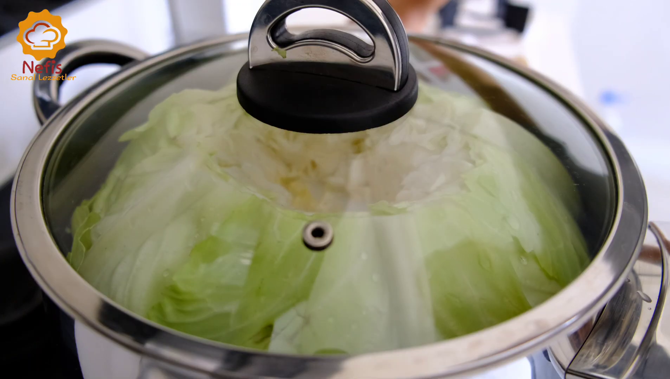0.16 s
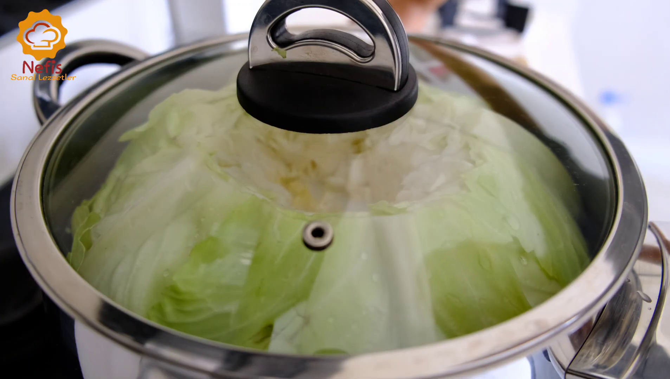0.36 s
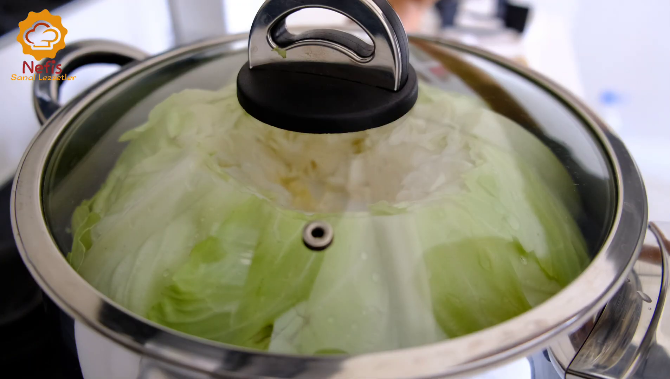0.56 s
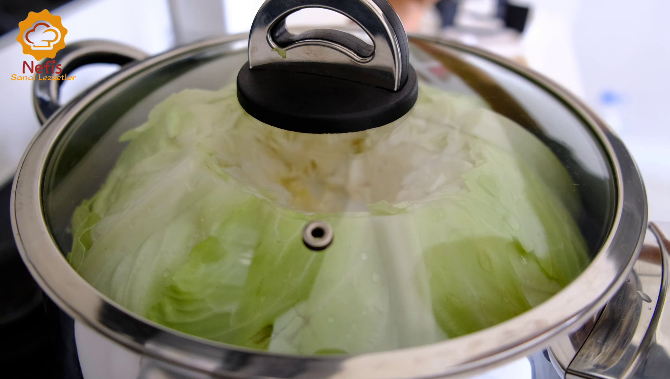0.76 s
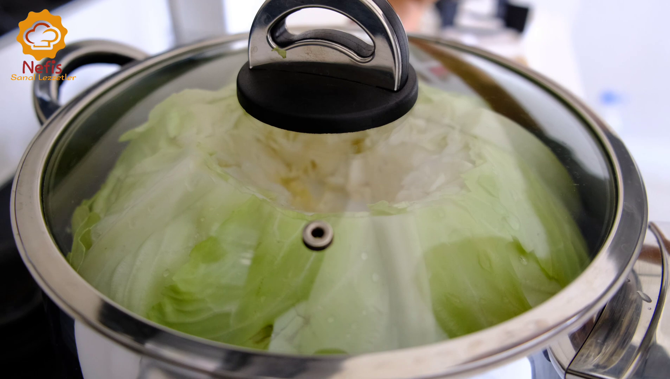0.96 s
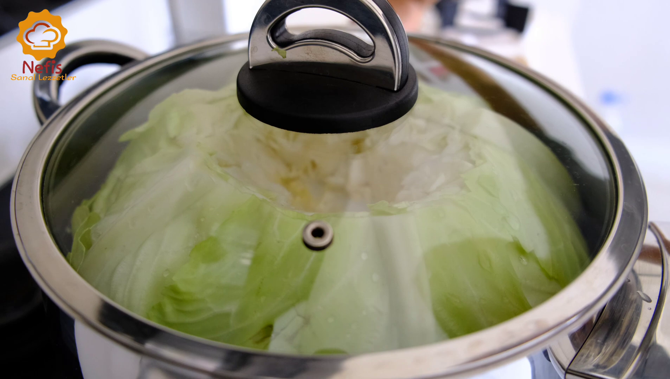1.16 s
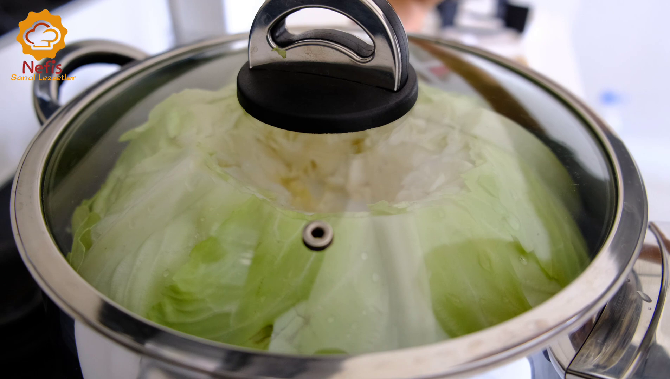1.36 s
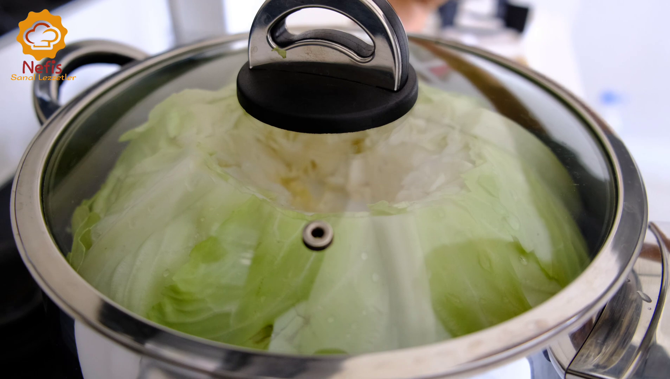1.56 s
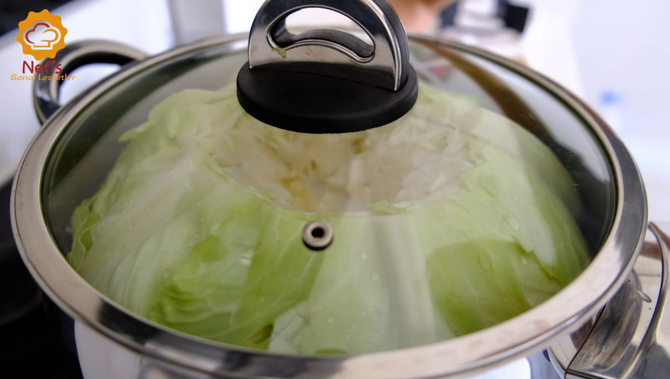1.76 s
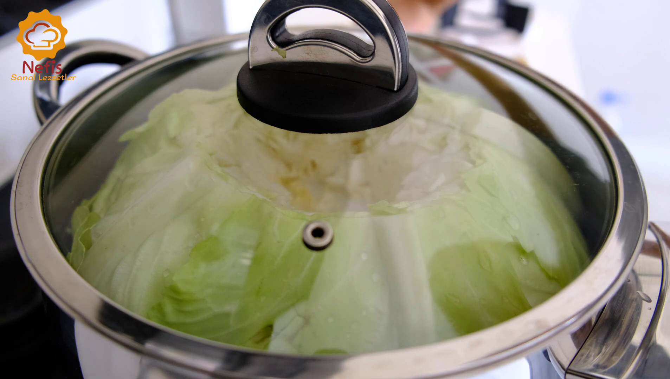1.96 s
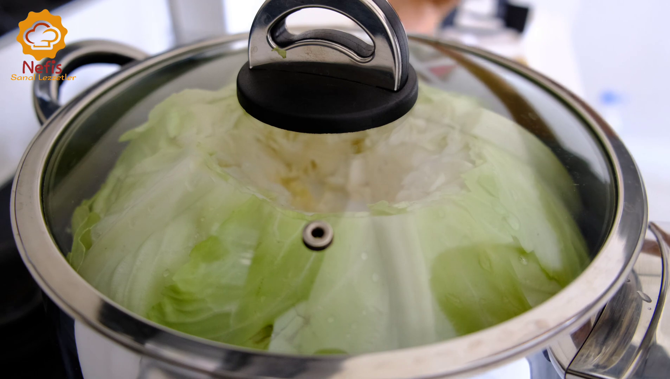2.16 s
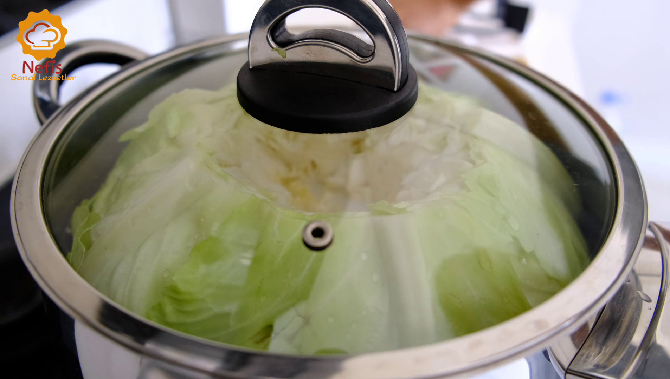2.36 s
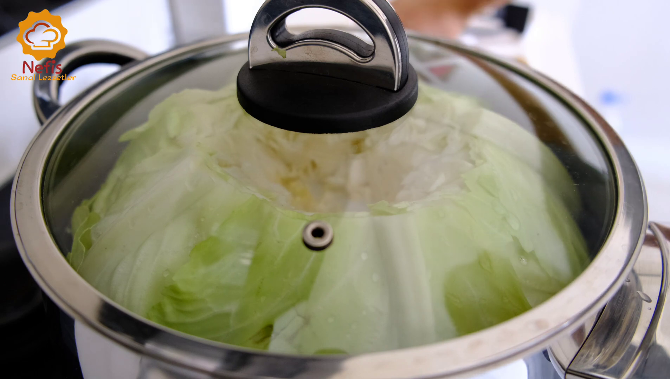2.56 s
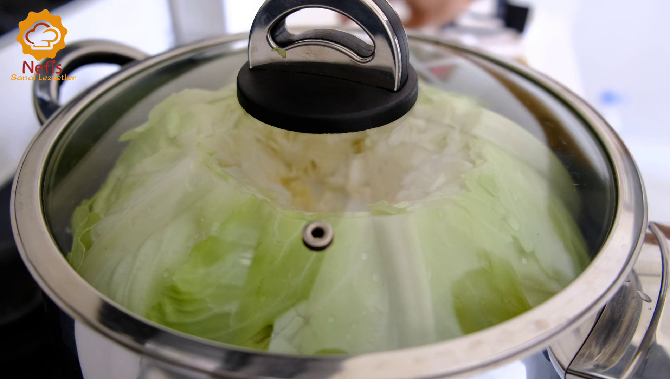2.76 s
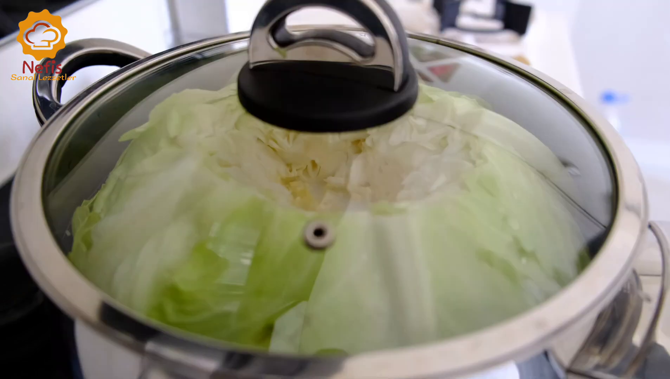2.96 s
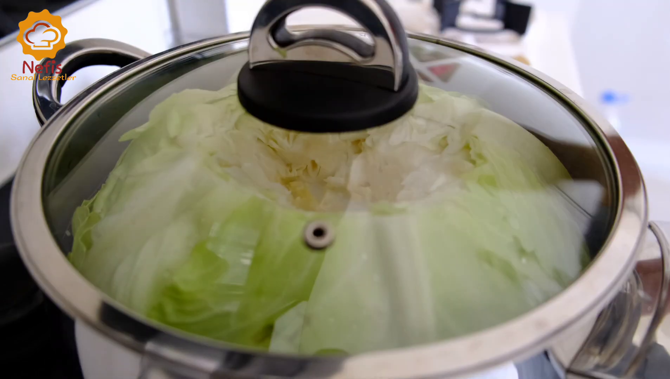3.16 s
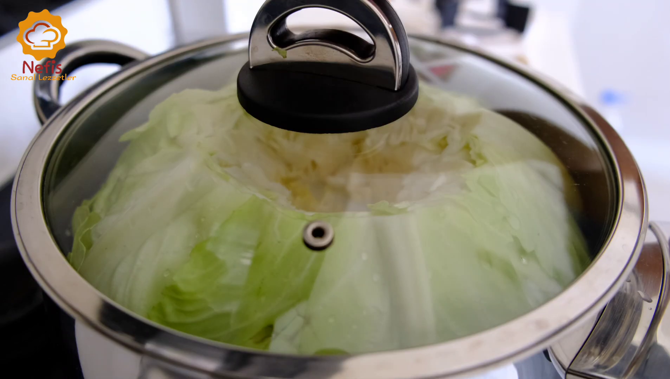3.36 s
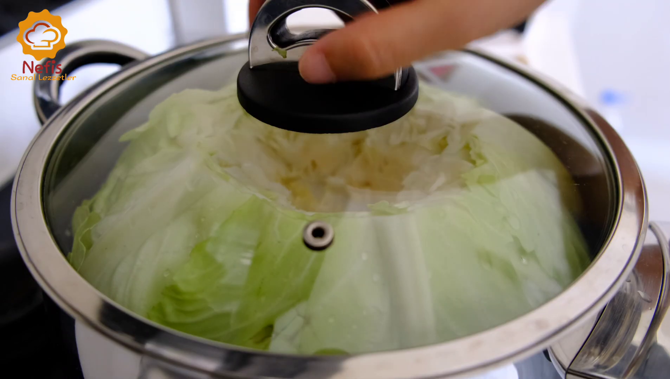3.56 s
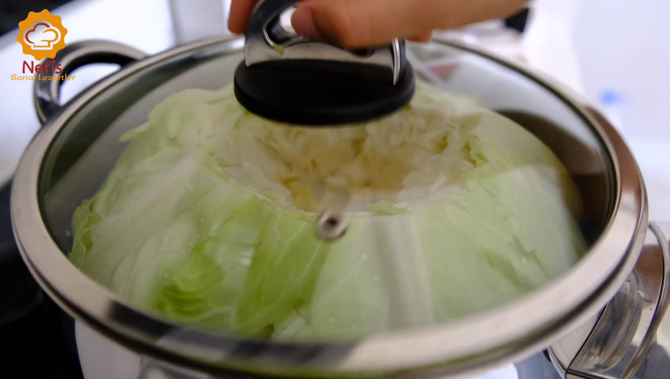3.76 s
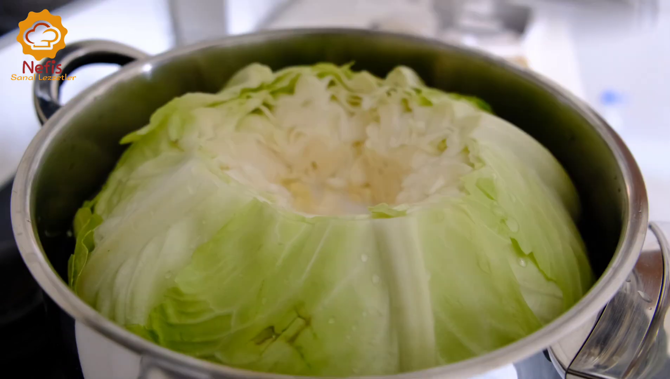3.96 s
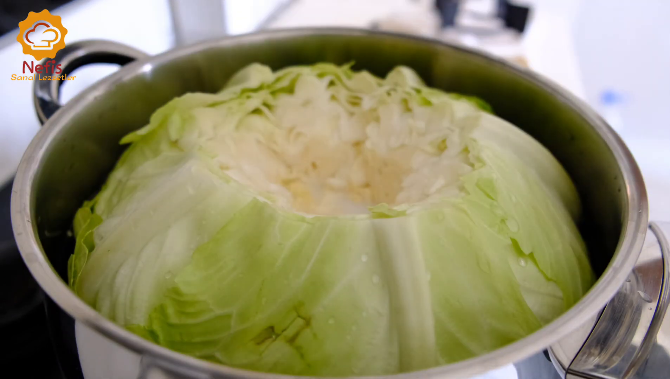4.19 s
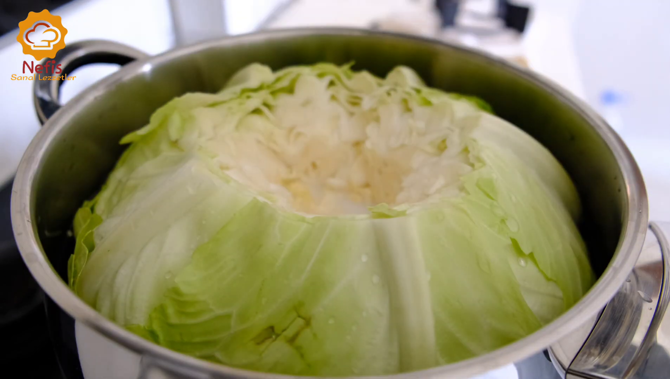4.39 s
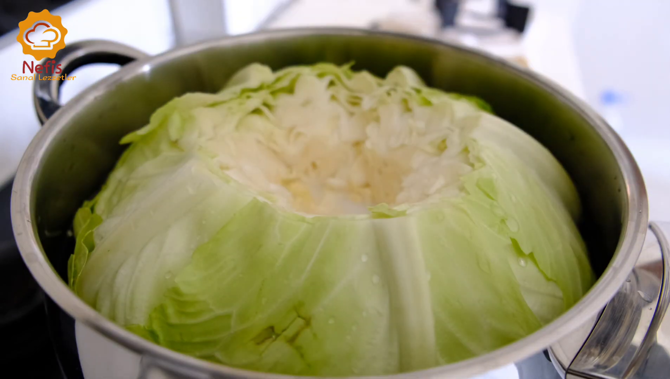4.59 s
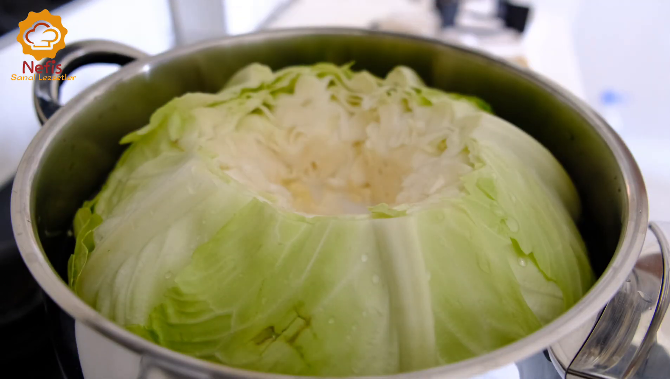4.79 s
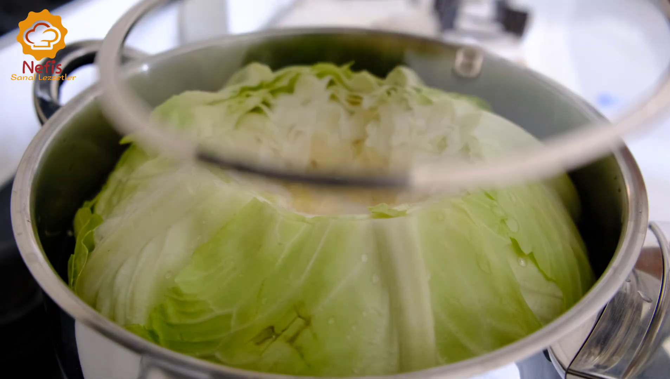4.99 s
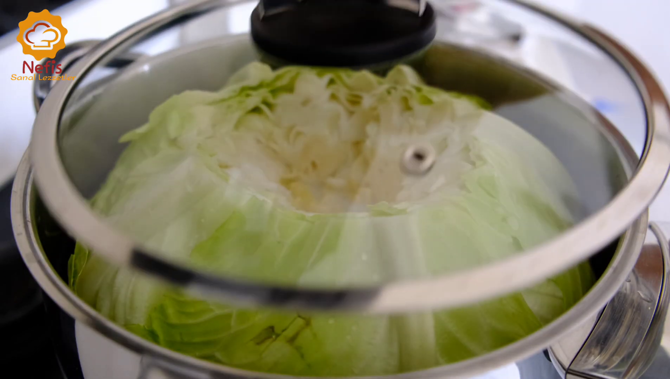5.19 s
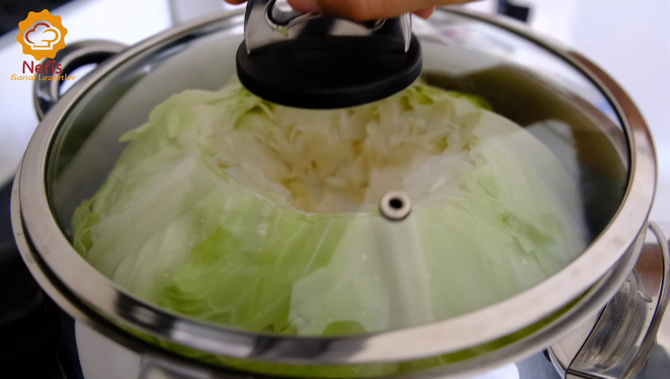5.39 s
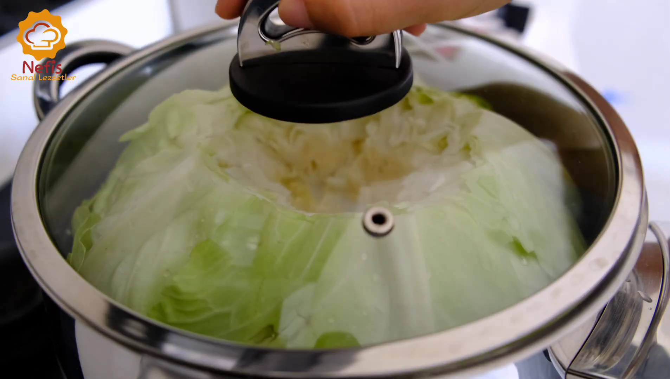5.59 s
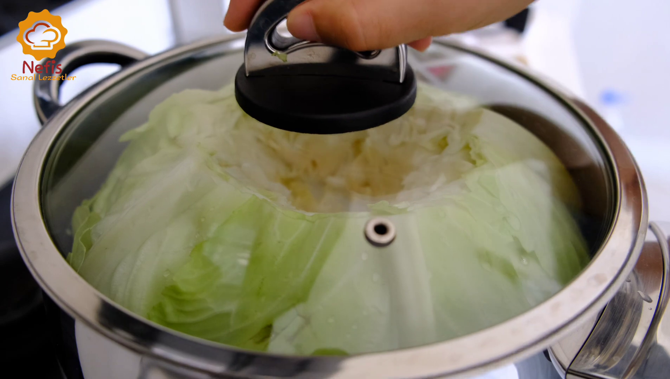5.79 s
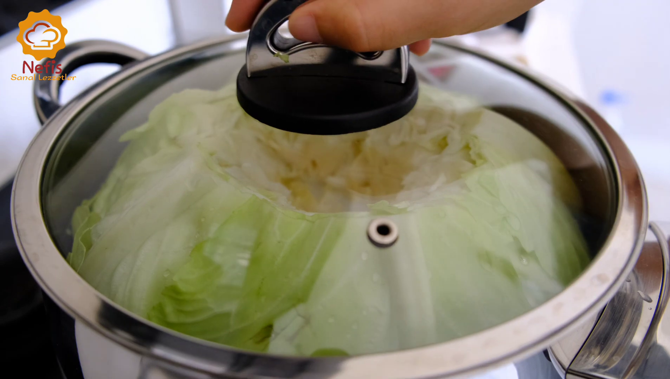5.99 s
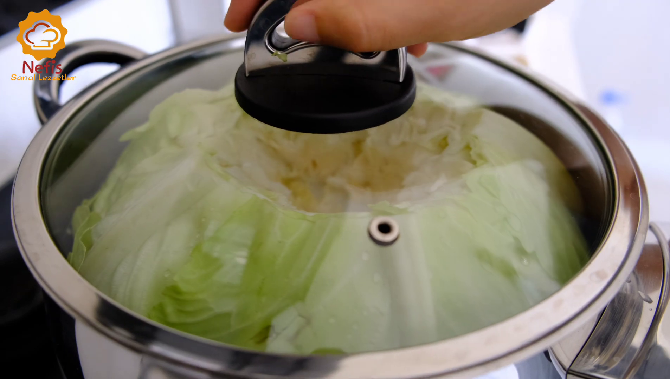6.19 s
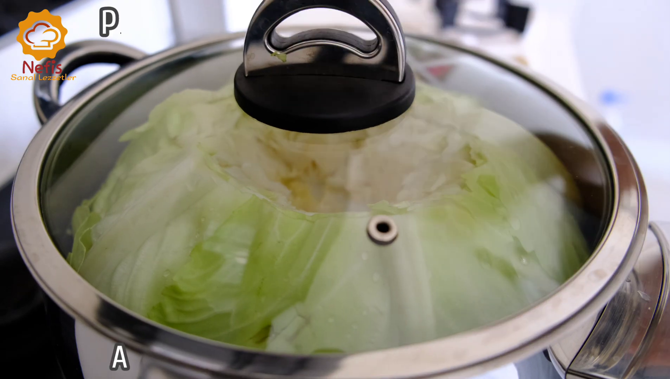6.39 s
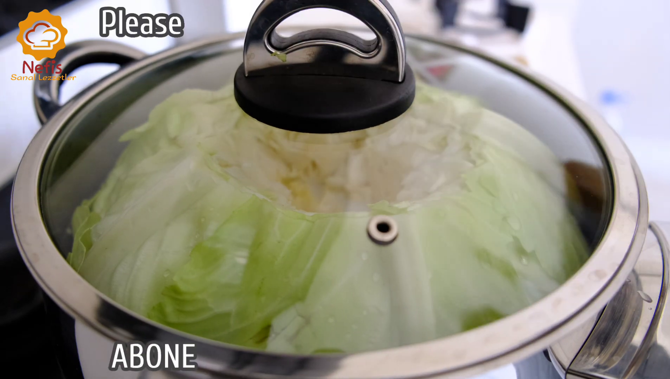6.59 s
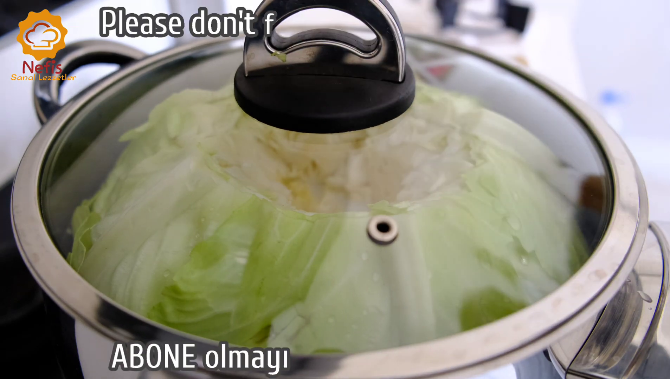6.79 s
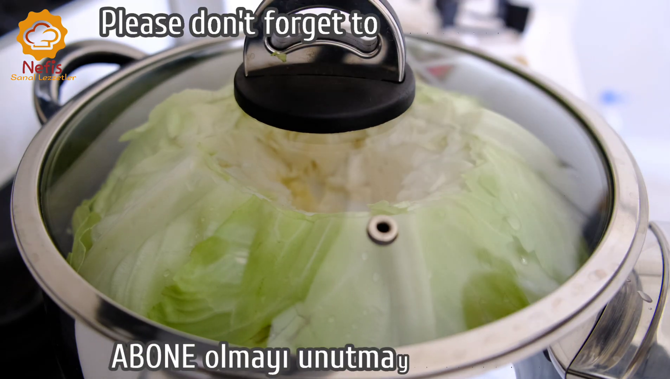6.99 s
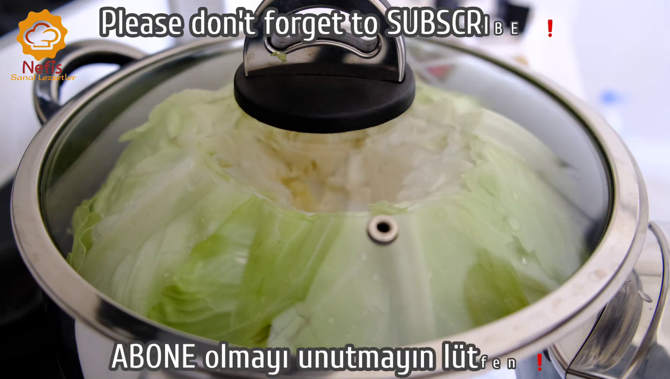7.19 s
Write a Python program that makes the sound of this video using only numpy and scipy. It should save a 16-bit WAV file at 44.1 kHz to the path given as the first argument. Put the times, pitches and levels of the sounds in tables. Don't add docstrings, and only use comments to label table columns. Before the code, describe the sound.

Gas hisses close by while an igniter snaps five times, a knob clicks off, then a glass lid clanks and rattles on a steel pot.

```python
import sys
import numpy as np
from scipy import signal
from scipy.fft import rfft, irfft, next_fast_len
from scipy.io import wavfile
from scipy.ndimage import uniform_filter1d, map_coordinates

SR = 44100
rng = np.random.default_rng(int(sys.argv[2]) if len(sys.argv) > 2 else 0)


def voltage_ratio(level):
    return 10 ** (np.asarray(level, float) / 20)


def inscribe(sig):
    pcm = np.round(np.clip(np.atleast_2d(sig).T, -1, 1) * 32767)
    wavfile.write(sys.argv[1], SR, pcm.astype(np.int16))


N = 319284

SHUT_S, CUT_S = 2.081, 3.012
MUTE_S = 0.019
SPARK_FIRST_S, SPARK_PERIOD_S = .2336, .38

# (level [dB], left short kick [full scale],
# left long kick [full scale], right short kick [full scale], right long kick [full scale])
SPARKS = [
    (-11, -1, 0.05, -0.063, 0.011),
    (-11, 0.35, 0.34, 0.053, 0.011),
    (-9, -0.062, 0.23, -0.39, 0.18),
    (-11, -0.42, -0.19, -0.048, .01),
    (-10, -0.25, 0.014, -0.14, 0.16),
]
# (time [s], pitch rise [share])
FLUSH = [
    (0, 0),
    (0.079, 0.063),
    (0.201, .04),
    (.4, 0.0092),
]
# (thump over weight [dB], crack over sharpness [dB],
# clatter [dB], free ring left by the hand [dB])
MOVES = [
    (16.5, 10, 4, 2),
    (-3, -12.5, 1.5, -6.5),
    (-10, -8, 0, -6),
    (-0.5, -17.5, 1, -12),
    (-1, -18, 0, -13),
    (3, -21, 3, -5),
]


def clock():
    return np.arange(N) / SR


def at_hz(points, hz):
    table = np.array(points)
    return np.interp(np.log(hz), np.log(table[:, 0]), table[:, 1])


def rms_one(x):
    return x / np.sqrt(np.mean(x ** 2) + 1e-20)


def band(x, low_hz, high_hz):
    return signal.sosfilt(signal.butter(2, [low_hz, min(high_hz, .45 * SR)], "band", fs=SR, output="sos"), x)


def ring(clicks, hz, t60):
    r, w = voltage_ratio(-60 / (t60 * SR)), 2 * np.pi * hz / SR
    return signal.lfilter([0, np.sin(w)], [1, -2 * r * np.cos(w), r * r], clicks + 1e-18)


def air_noise(spectrum, peaks, size):
    # (frequency [Hz], left-right likeness [correlation])
    likeness = [(60, 0.78), (150, 0.73), (380, 0.79), (950, 0.81), (2380, 0.11), (5980, -0.04),
                (15000, 0.16)]
    # (frequency [Hz], left minus right [dB])
    lean = [(60, 1.5), (180, 0), (550, 0.5), (1650, -1), (4970, 0), (15000, 1.5)]
    hz = np.maximum(np.arange(size // 2 + 1) * SR / size, 1)
    shape_db = at_hz(spectrum, hz)
    for f, width, lift in peaks:
        shape_db = shape_db + lift / (1 + (2 * (hz - f) / width) ** 2)
    alike = np.clip(at_hz(likeness, hz), -1, 1)
    mid, side = rfft(rng.standard_normal((2, size)))
    pair = np.sqrt(1 + alike) * mid + np.sqrt(1 - alike) * side * [[1], [-1]]
    return rms_one(irfft(pair * voltage_ratio(shape_db + at_hz(lean, hz) * [[.5], [-.5]]), size))


def room_tone():
    # (frequency [Hz], density [dB per Hz])
    air_spectrum = [(15, -46.5), (25, 2.5), (221, -9.5), (253, -12.5), (322, -8.5), (445, -18.5),
                    (495, -9.5), (631, -12.5), (1660, -14.5), (10600, -37), (15500, -37)]
    t = clock()
    steady_db = np.where(t < CUT_S, -57.5, -57.5 + 0.95 * (t - CUT_S))
    steady_db = steady_db - 25 * ((t > CUT_S - MUTE_S) & (t < CUT_S))
    bump_db = -35.5 - 113 * t
    gain = np.hypot(voltage_ratio(steady_db), voltage_ratio(bump_db))
    return uniform_filter1d(gain, size=200) * air_noise(air_spectrum, [], size=next_fast_len(N))[:, :N]


def sleeve():
    # (peak time [s], rise [s], swish level [dB], brush level [dB])
    strokes = [
        (2.794, 0.16, -63.5, -53.5),
        (2.904, 0.021, -68, -50.5),
        (2.948, .045, -80, -53),
        (3.0, 0.052, -76, -75),
    ]
    depth_db, fall_db_per_s = 18.5, 329
    t, size, swish, rub = clock(), next_fast_len(N), 0, 0
    cloth = air_noise([(1000, -22), (2500, 6), (8000, -5.0), (15500, -15)], [], size=size)[:, :N]
    brush = air_noise([(250, -6.5), (500, -4.0), (1500, -5), (3000, -32.0)], [], size=size)[:, :N]
    for s, rise, swish_db, brush_db in strokes:
        stroke_db = np.where(t < s, depth_db * (t - s) / rise, fall_db_per_s * (s - t))
        shape = voltage_ratio(stroke_db) * (t < CUT_S - MUTE_S / 2)
        swish = swish + voltage_ratio(swish_db + 10.0) * shape
        rub = rub + voltage_ratio(brush_db - 4.0) * shape
    return swish * cloth + rub * brush


def gas_db(open_db, sag, flush_db, after_db, late_sag):
    t = clock()
    flush = np.interp(t, *np.transpose(FLUSH))
    burning = open_db - sag * np.minimum(t, SHUT_S) + flush_db * flush
    since = np.maximum(t - SHUT_S, 0)
    drop_db, drop_s, bleed_db_per_s = 11.5, 0.04, 38.5
    first = burning - drop_db * np.minimum(since / drop_s, 1) - bleed_db_per_s * since
    return np.where(t < CUT_S, first, after_db - late_sag * (t - CUT_S))


def flutter():
    level_db = gas_db(-49.5, sag=8, flush_db=91, after_db=-59, late_sag=0.8)
    spectrum = [(25, -9), (50, 2), (125, 4.5), (220, -18), (600, -41.5)]
    return voltage_ratio(level_db) * air_noise(spectrum, [], size=next_fast_len(N))[:, :N]


def jet():
    # (frequency [Hz], density [dB per Hz])
    jet_spectrum = [(180, -41.5), (300, -22), (835, -6.5), (1030, -6), (2000, -14.5), (3690, -10.5),
                    (4280, -12.5), (4800, -8.5), (5300, -23.5), (5950, -13.5), (8140, -17), (14800, -20),
                    (15700, -44)]
    # (frequency [Hz], width [Hz], lift [dB])
    burner = [(565, 120, 3.5), (950, 60, 8.5), (1042, 28, 9.5), (1254, 200, 14), (1429, 83, 10),
              (3210, 120, 10.5), (3675, 131, 15.5), (4728, 180, 9), (5580, 470, 12), (6636, 160, 7),
              (7600, 180, 4), (8650, 200, 10), (9300, 170, -3), (10000, 300, 2), (11020, 360, 10)]
    # (frequency [Hz], width [Hz], lift [dB])
    gaps = [(4230, 110, -5.5), (5300, 147.8, -16.5), (5660, 170, -6), (7180, 150, -8.5), (7960, 200, -19),
            (8820, 100, -18), (7350, 80, -7.5), (9600, 97, -13.5), (10480, 79, -9), (12250, 150, -10.5)]
    flow_db = gas_db(-46.5, sag=1.2, flush_db=60.5, after_db=-45, late_sag=0)
    hiss = air_noise(jet_spectrum, burner + gaps, size=next_fast_len(N + SR // 10))
    ahead = np.cumsum(np.interp(clock(), *np.transpose(FLUSH)))
    ahead *= np.round(ahead[-1]) / ahead[-1]
    moved = [map_coordinates(side, [np.arange(N) + ahead], order=2) for side in hiss]
    return uniform_filter1d(voltage_ratio(flow_db), size=200) * moved


def knocks(rows):
    t, out = np.arange(int(.1 * SR)) / SR, np.zeros((2, N))
    for s, db, hz, t60 in rows:
        push = air_noise([(20, 0.0051), (20000, 0)], [], size=len(t)) * voltage_ratio(-60 * t / t60)
        push[:, 0] += 0.49 * np.sqrt(t60 * SR)
        spread = 1.08 + 5.0 / (hz * t60)
        knock = band(push, hz / spread, hz * spread)
        out[:, round(s * SR):][:, :len(t)] += voltage_ratio(db) * knock / np.abs(knock).max()
    return out


def knob():
    # (time [s], level [dB], centre [Hz], t60 [s])
    clicks = [
        (2.188, -31.5, 2330, .12),
        (2.188, -29, 2070, 0.063),
        (2.188, -37.5, 650, 0.062),
        (2.189, -38, 1200, 0.044),
        (2.189, -30.5, 950, 0.036),
        (2.19, -44, 200, 0.039),
        (2.189, -41, 4600, 0.018),
        (2.787, -46, 312, 0.032),
    ]
    return knocks(clicks)


def ticks():
    # (time [s], level [dB], centre [Hz], t60 [s])
    taps = [
        (.595, -34, 1200, 0.0086),
        (2.075, -38.5, 109.1, 0.06),
        (2.075, -44.5, 331, 0.027),
        (2.076, -38.5, 750, 0.015),
        (6.114, -10, 1650, 0.05),
        (6.384, -19, 1316, 0.071),
        (6.459, -38, 1390, 0.032),
    ]
    return knocks(taps)


def sparks():
    t = np.arange(int(.35 * SR)) / SR
    bounce = (1 - np.exp(-t / .00015)) * voltage_ratio(-900 * t) / (1 + (t / .0045) ** 6)
    enclosure = (1 - np.exp(-t / .003)) * (voltage_ratio(-31 - 820 * t) + voltage_ratio(-26.5 - 154 * t))
    common, out = rng.standard_normal((2, len(t))), np.zeros((2, N))
    common[1] -= 0.32 * common[0]
    for k, (db, *_) in enumerate(SPARKS):
        s = SPARK_FIRST_S + k * SPARK_PERIOD_S
        crack = common + .5 * rng.standard_normal((2, len(t)))
        bright = band(crack, 5490, 11200)
        bright = bright + voltage_ratio(-4.5) * band(crack, 3400, 6400) + voltage_ratio(-9.5) * band(crack, 14000, 16400)
        sound = bright * (bounce + enclosure) + voltage_ratio(-6) * band(crack, 867, 2600) * bounce
        out[:, round(s * SR):][:, :len(t)] += voltage_ratio(db + 9.5) * sound * voltage_ratio(np.array([[1.5], [-1.5]]))
    return out


def contacts():
    # (time [s], clink [dB], weight into the pot body [dB], sharpness into the glass [dB])
    settle = [
        (0.002, -43, -6, -20),
    ]
    lift = [(3.74, -40.5, 1.5, 0), (3.751, -53.5, 16, -3), (3.778, -36.5, 3, 0), (3.786, -33, 8.5, 10.5),
            (3.797, -17, -2.5, -7), (3.812, -41, 18, 13.5), (3.834, -31, 2, 4.5), (3.869, -38, 5, 2)]
    set_down = [(5.575, -28, 3, -3), (5.588, -23.5, -2.5, -3), (5.624, -26.5, -8, -7.5),
                (5.635, -19.5, -6, -10), (5.643, -29.5, 8, 1.5), (5.663, -29, 3, -2.5),
                (5.685, -45.5, 14, 6.5)]
    shift = [(5.856, -20, 1.5, 4), (5.861, -20, -11, -1), (5.874, -29, 6.5, 7), (5.882, -21.5, -5, -13),
             (5.926, -25.5, -4.5, -0.5), (5.936, -35.5, 3.5, -5), (5.99, -36, -12, -16),
             (6.049, -45.5, 6, 1.5)]
    nudge = [(6.113, -18, -14.5, -3), (6.12, -31.5, 11, -1), (6.149, -21.5, -9.5, -21),
             (6.185, -37, 5.5, 4)]
    let_go = [(6.384, -29.5, -10.5, -8.5), (6.411, -33.5, 6.5, 3.5), (6.419, -35, 7.5, -7),
              (6.458, -31.5, -5, -6), (6.488, -31, 4, -0.5), (6.496, -47.5, 8, 14)]
    tables = [settle, lift, set_down, shift, nudge, let_go]
    move = np.repeat(np.arange(6), [len(table) for table in tables])
    s, db, weight, sharp = np.vstack(tables).T
    thump, crack = np.array(MOVES)[move, :2].T
    colour = db[:, None] + np.c_[weight + thump, weight, 0 * s, sharp, sharp + crack]
    return s, colour, move


def modes(at, colour, move, signs, grip_db):
    contact_hz = [170, 500, 1100, 2500, 6000]
    move_column = [3, 0, 1, 2, 3, 3]
    # (frequency [Hz], t60 [s], lifted [dB], set down
    # [dB], shifted [dB], let go [dB])
    struck_modes = [(121.1, 0.36, -7.5, -19, -19, -3.5), (146, 0.16, -15.5, -3.5, 1.5, -3),
                    (186, 0.073, -1, 1, 4.5, -2), (275.6, 0.19, -10.5, -3, -9, -15),
                    (359, 0.27, -13, -29, -7, -5), (485.8, 0.15, -5, -5, -7.5, -7),
                    (630.2, 0.15, -4.5, 0, -0.5, 1.5), (732, 0.19, -9.5, -11, -15, -9.5),
                    (837, 0.11, -7, -20, -10, -13.5), (959, 0.23, -7.5, 4, 2, -15),
                    (1093, 0.11, -17, -9.5, 0.5, -22), (1200, 0.15, -15, -24, -3, -20),
                    (1285, 0.1, -6, -22, -15, -7.5), (1643, 0.23, -12, -8.5, -5.5, -65),
                    (1780, 0.089, -2.5, 0, -22, -21.5), (1913, 0.1, -8, -22, -4, -11),
                   (2534, .13, -11, 2, -3.5, -7), (2580, 0.14, -5, 6, -0.5, -9.5),
                   (2626, .13, -16, 1.5, -6, -5), (2787, .1, -11, -3, -1.5, -4.5),
                   (3430, 0.17, -14, -8, -7, -6), (3540, .11, -7, -1, -14, -14),
                   (4330, 0.097, -12, -14, 1, -10.5), (4600, 0.094, -14, -2, -16, -12),
                   (5310, .09, -4, -5.5, 2, -1), (5990, 0.18, -8, -1, 1, -4),
                   (6920, 0.12, -12, -5, -12, -12)]
    free = np.zeros(N)
    free[at] = voltage_ratio(grip_db)
    rebound = rng.integers(160, 460, 40)
    lags = rng.integers(6, 70, (40, 1)) + rng.integers(-5, 6, (40, 2))
    out = np.zeros((2, N))
    for k, (hz, t60, *move_db) in enumerate(struck_modes):
        strength = np.array([np.interp(np.log(hz), np.log(contact_hz), c) for c in colour])
        clicks = np.zeros(N)
        clicks[at] = voltage_ratio(strength + np.array(move_db)[move_column][move] + 6.0) * signs[:, k]
        swing = ring(clicks, hz, 0.011 + 6.0 / hz)
        tone = ring(clicks * free, hz, t60) + voltage_ratio(-3.0) * swing + voltage_ratio(-4.5) * np.roll(swing, rebound[k])
        out += [np.roll(tone, lags[k, 0]), np.roll(tone, lags[k, 1])]
    return out


def clatter(at, colour, clatter_db):
    grains = np.minimum(rng.exponential(1, N // 40 + 1), 4).repeat(40)[:N]
    grit = voltage_ratio(2.8 * grains)
    scratch = air_noise([(300, 0), (16000, 0.076)], [], size=N) * rms_one(grit)
    out = np.zeros((2, N))
    # (contact centre, low Hz, high Hz, dB, t60 s)
    for column, low_hz, high_hz, db, t60 in [(1, 346, 1217, 9.4, 0.16), (2, 960, 1830, 8.4, 0.13),
                                             (3, 1040, 3960, 7, 0.14), (4, 3100, 10000, 7.7, 0.076)]:
        clicks = np.zeros(N)
        clicks[at] = voltage_ratio(colour[:, column] + db + clatter_db)
        power = signal.lfilter([1], [1, -voltage_ratio(-120 / (t60 * SR))], clicks ** 2 + 1e-18)
        out += band(scratch * np.sqrt(power), low_hz, high_hz)
    return out


def hob_thud(at, colour, signs):
    thud_db, thud_hz = 26, 45
    push = np.zeros(N)
    push[at] = voltage_ratio(colour[:, 0] + thud_db) * signs[:, -1]
    return band(push + 1e-18, thud_hz / 2.0, thud_hz * 2.8)


def lid():
    s, colour, move = contacts()
    at = (s * SR).astype(int)
    clatter_db, grip_db = np.array(MOVES)[move, 2:].T
    signs = rng.choice([-1, 1], (len(at), 40))
    struck = modes(at, colour, move, signs, grip_db) + clatter(at, colour, clatter_db)
    struck = signal.sosfilt(signal.butter(2, 55, "high", fs=SR, output="sos"), struck)
    return struck + hob_thud(at, colour, signs)


def kitchen(x):
    # (frequency [Hz], t60 [s])
    reverb = [(125, 0.49), (500, 0.48), (2000, 0.47), (8000, 0.56), (14000, 0.31)]
    t = np.arange(SR // 2) / SR
    noise = air_noise([(20, 0.014), (20000, 0.011)], [], size=len(t))
    tail = np.zeros((2, len(t)))
    for hz in 62 * 2 ** np.arange(9):
        tail += band(noise, hz / 2 ** .5, hz * 2 ** .5) * voltage_ratio(-60 * t / at_hz(reverb, hz))
    tail = tail * (1 - np.exp(-t / 0.0013)) / np.sqrt(SR)
    return signal.fftconvolve(x.mean(0)[None], tail, axes=1)[:, :N]


def scene():
    air = room_tone() + sleeve()
    gas = flutter() + jet()
    valve = knob()
    pot = lid() + ticks()
    tail = kitchen(voltage_ratio(13.5) * pot + voltage_ratio(23) * valve)
    return air + gas + valve + sparks() + pot + tail


def overload_kicks():
    t, out = np.arange(int(.04 * SR)) / SR, np.zeros((2, N))
    short = np.exp(-((t - .0012) / 0.00025) ** 2)
    long = (1 - np.exp(-(t / 0.0012) ** 4)) * np.exp(-t / 0.0024) * 2.5
    for k, (_, *kick) in enumerate(SPARKS):
        s = SPARK_FIRST_S + k * SPARK_PERIOD_S
        out[:, round(s * SR):][:, :len(t)] += np.reshape(kick, (2, 2)) @ [short, long]
    return out


def top_cut(x):
    return signal.sosfilt(signal.butter(12, 16500, fs=SR, output="sos"), x)


def record(dry):
    peak_db = 20 * np.log10(uniform_filter1d(np.abs(dry).max(0), size=64) + 1e-9)
    over_db = np.maximum(peak_db + 32, 0) * 0.28
    ramp = 28 * clock()
    held_db = np.maximum.accumulate(over_db + ramp) - ramp
    r = np.exp(-1 / (0.0091 * SR))
    duck_db = signal.lfilter([1 - r], [1, -r], held_db)
    x = np.tanh(dry * voltage_ratio(-duck_db)) + overload_kicks()
    x = signal.sosfilt(signal.butter(1, 12, "high", fs=SR, output="sos"), x)
    x = signal.sosfilt(signal.cheby2(10, 60, 16700, fs=SR, output="sos"), x)
    return top_cut(np.clip(x, -1, 1))


dry = scene()
out = record(dry)
inscribe(out)
```